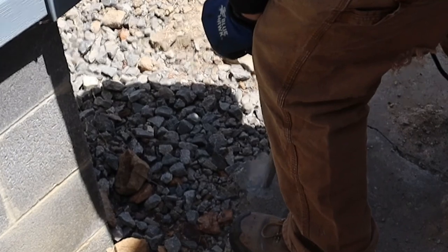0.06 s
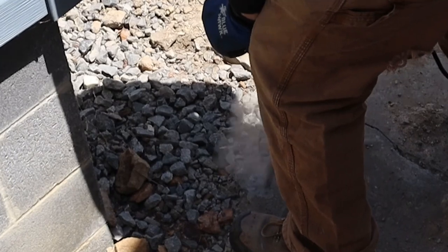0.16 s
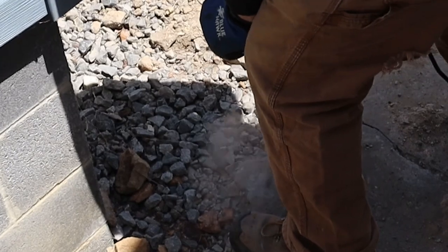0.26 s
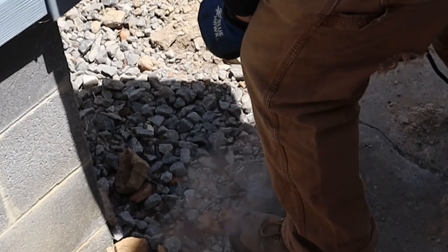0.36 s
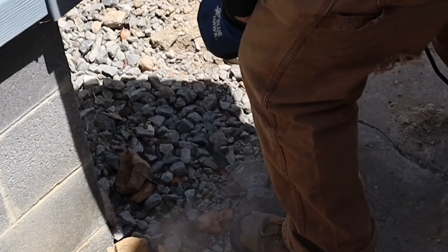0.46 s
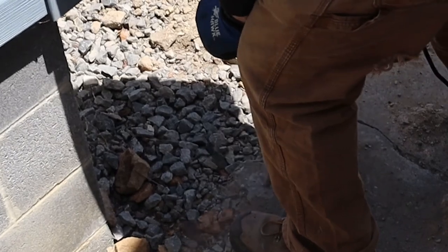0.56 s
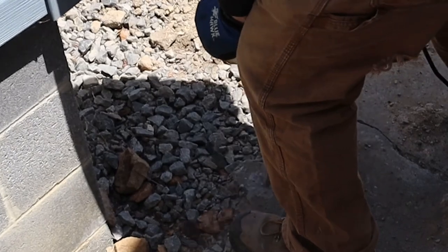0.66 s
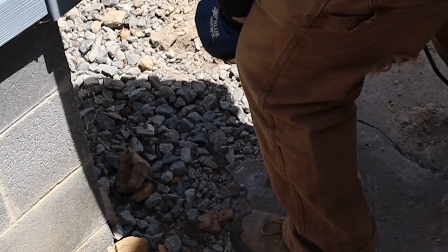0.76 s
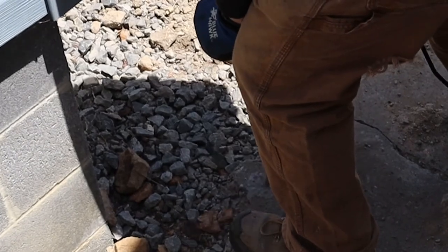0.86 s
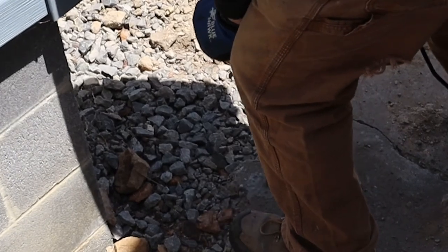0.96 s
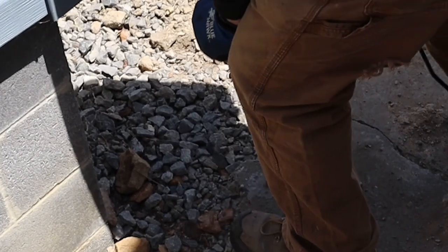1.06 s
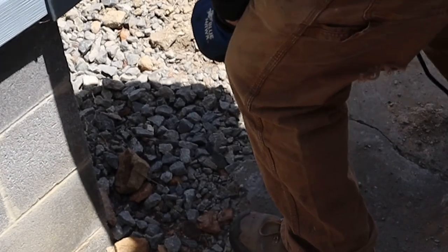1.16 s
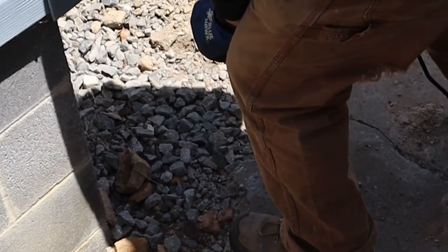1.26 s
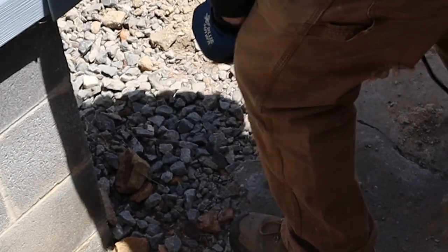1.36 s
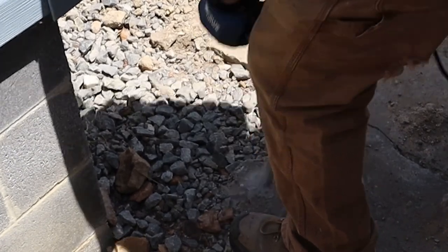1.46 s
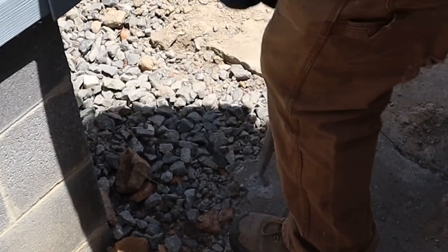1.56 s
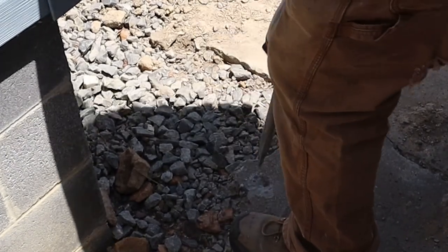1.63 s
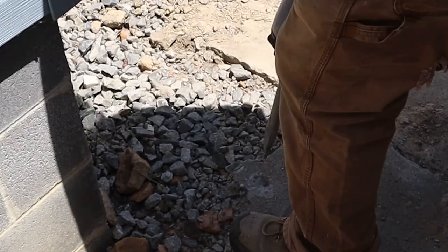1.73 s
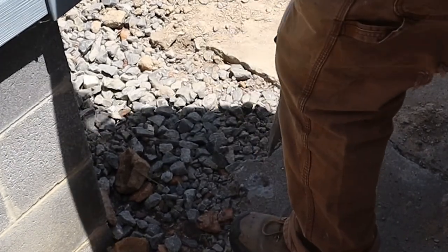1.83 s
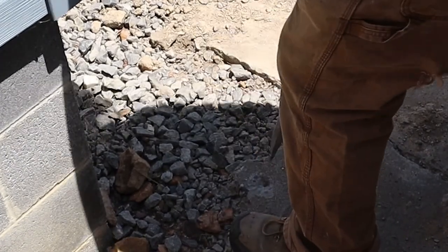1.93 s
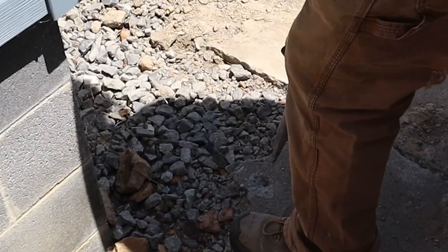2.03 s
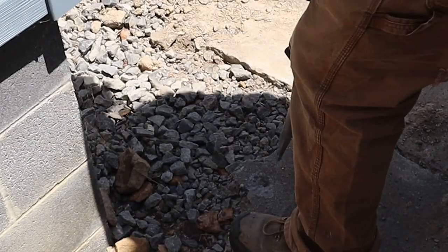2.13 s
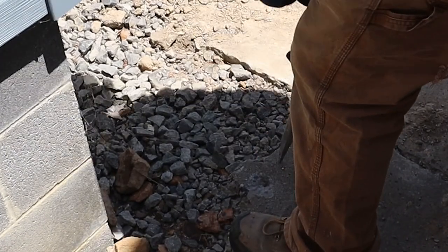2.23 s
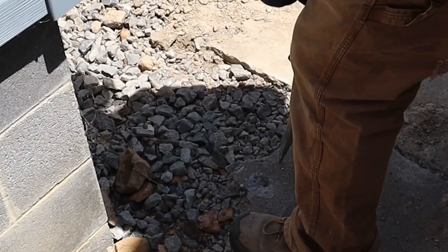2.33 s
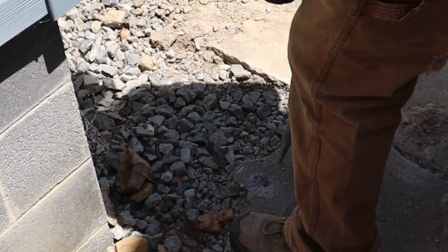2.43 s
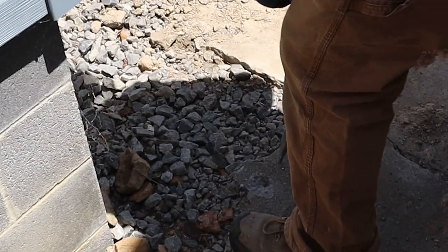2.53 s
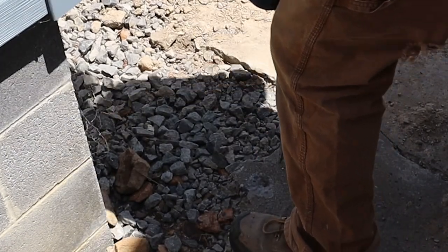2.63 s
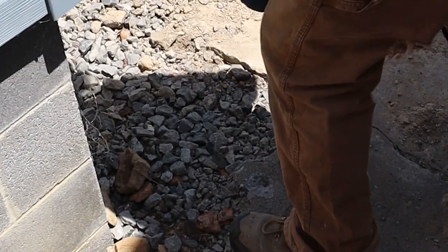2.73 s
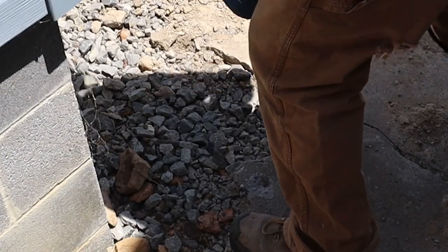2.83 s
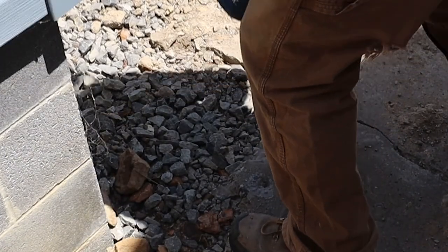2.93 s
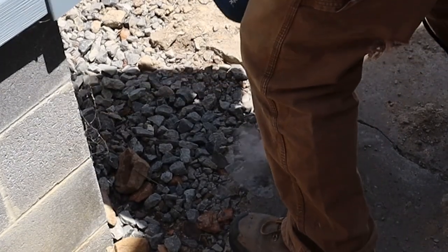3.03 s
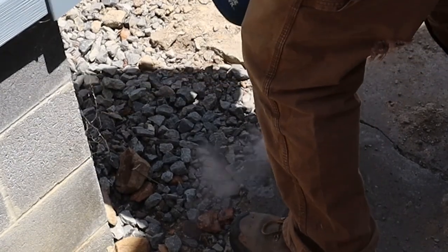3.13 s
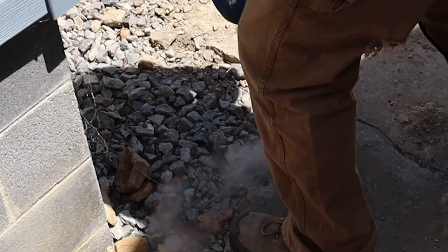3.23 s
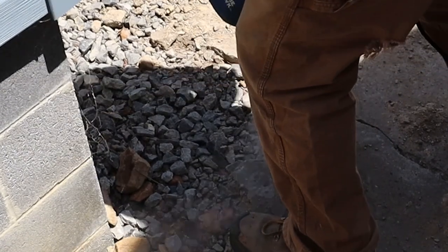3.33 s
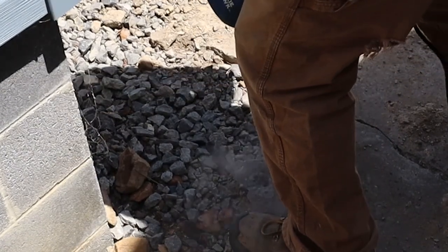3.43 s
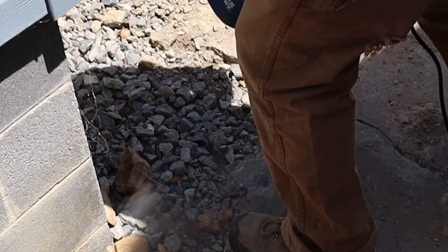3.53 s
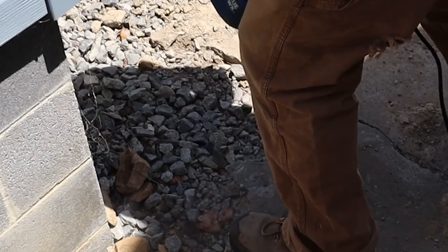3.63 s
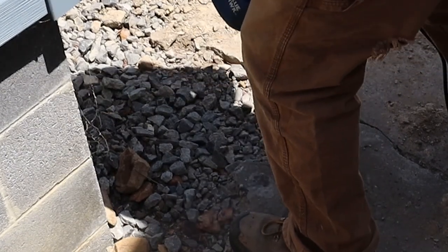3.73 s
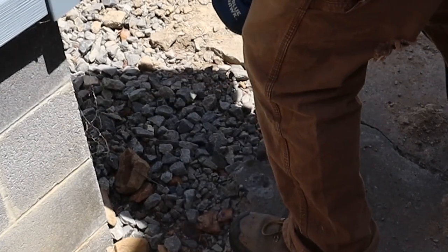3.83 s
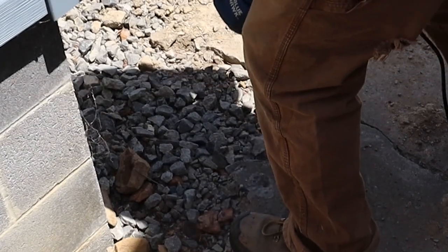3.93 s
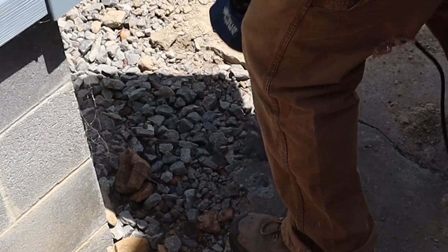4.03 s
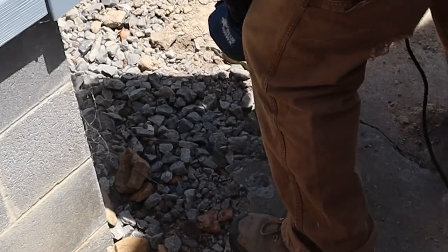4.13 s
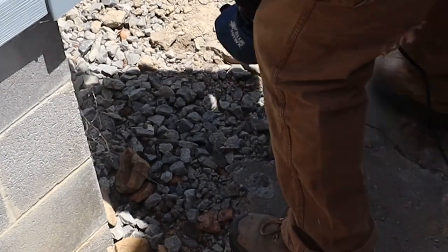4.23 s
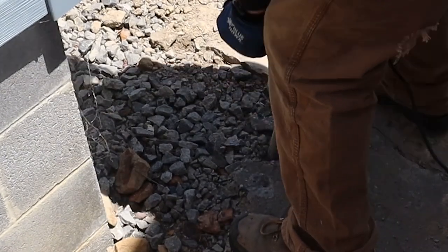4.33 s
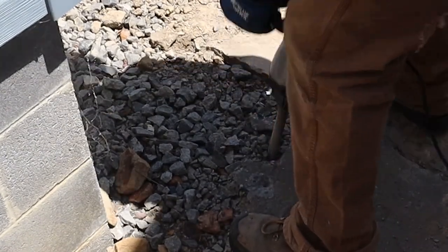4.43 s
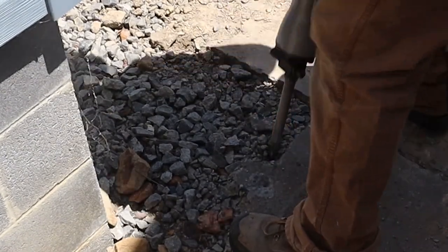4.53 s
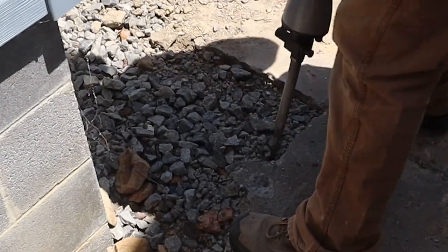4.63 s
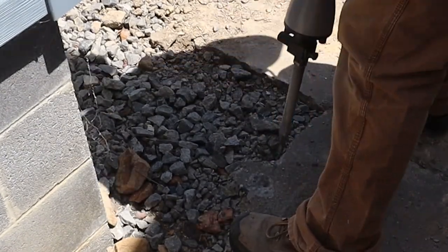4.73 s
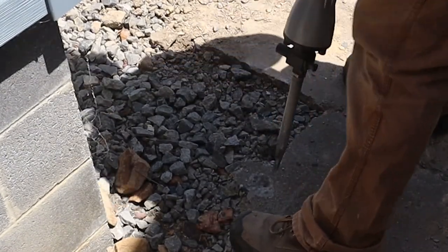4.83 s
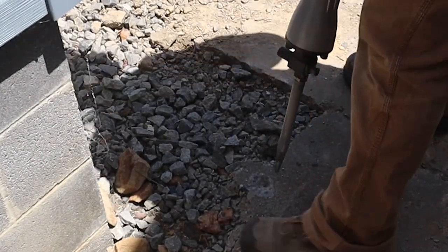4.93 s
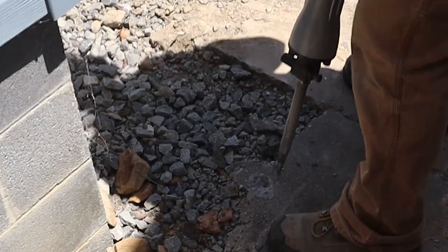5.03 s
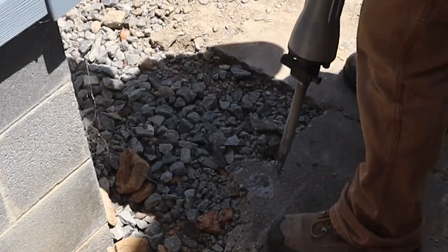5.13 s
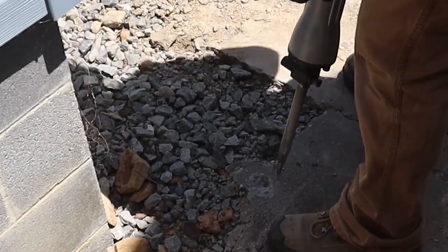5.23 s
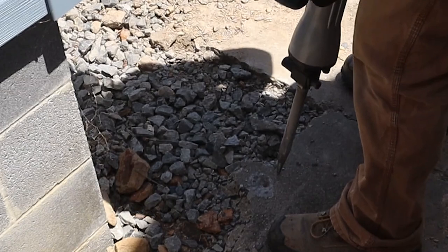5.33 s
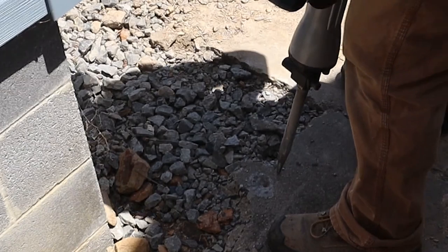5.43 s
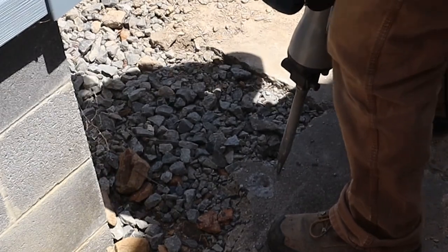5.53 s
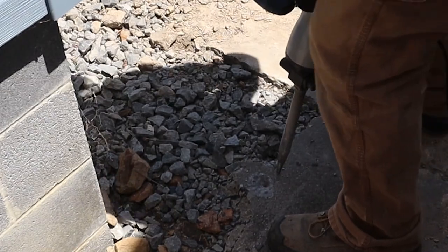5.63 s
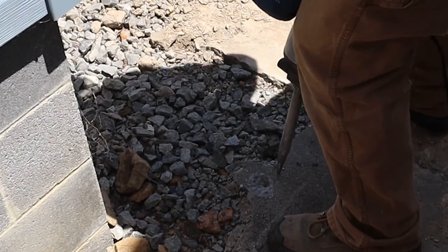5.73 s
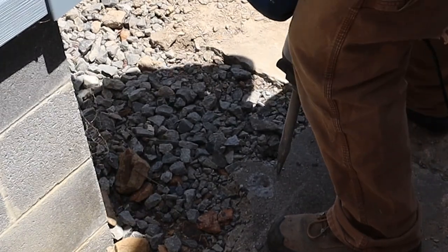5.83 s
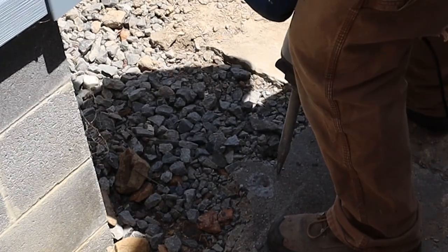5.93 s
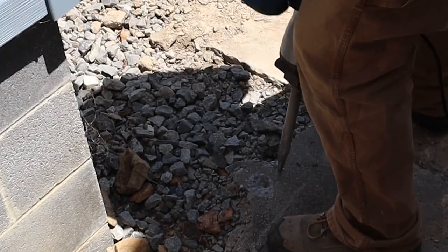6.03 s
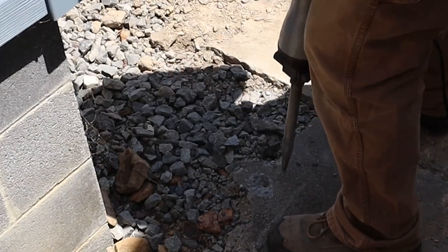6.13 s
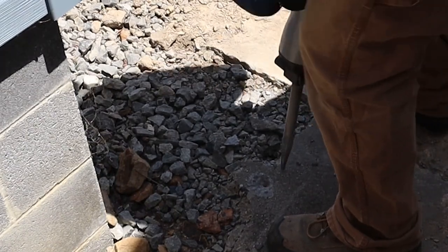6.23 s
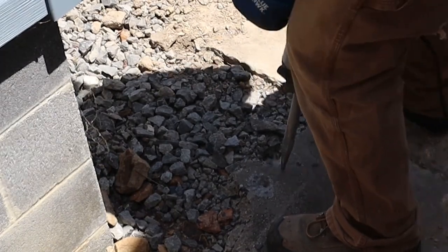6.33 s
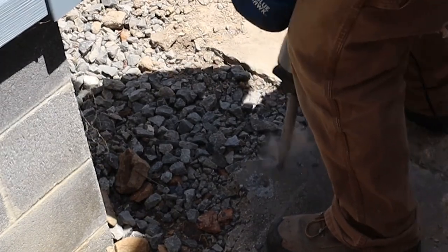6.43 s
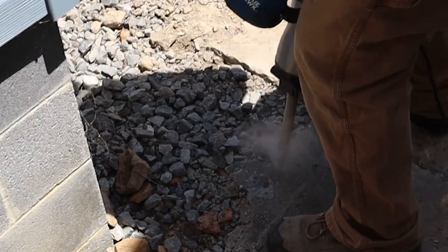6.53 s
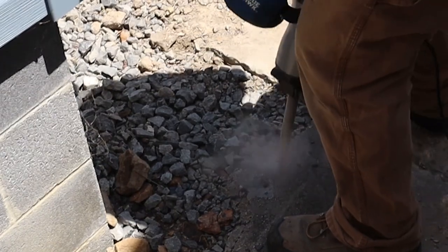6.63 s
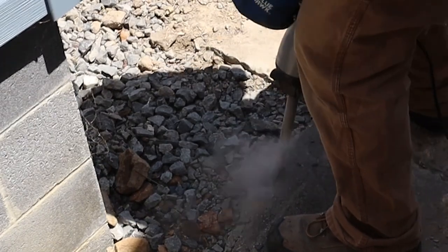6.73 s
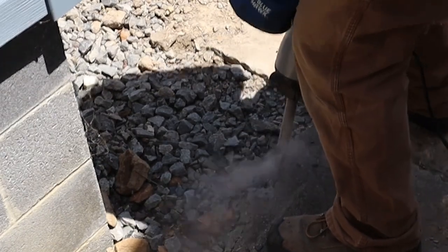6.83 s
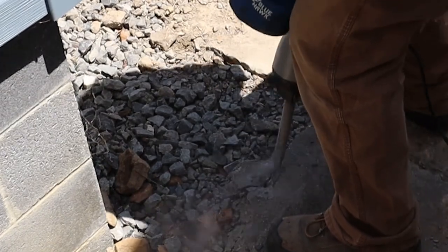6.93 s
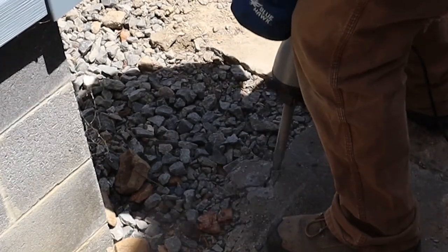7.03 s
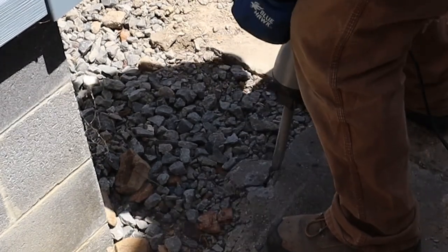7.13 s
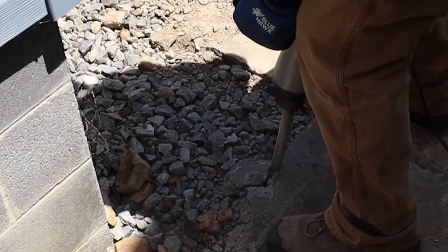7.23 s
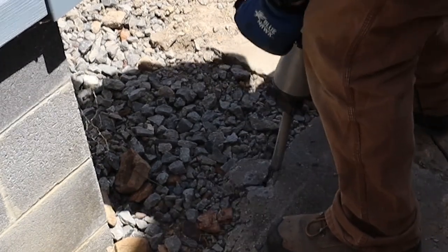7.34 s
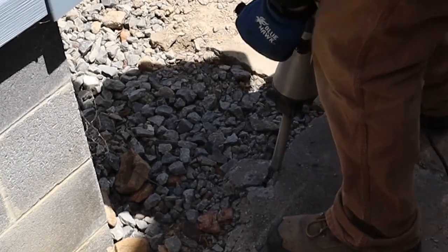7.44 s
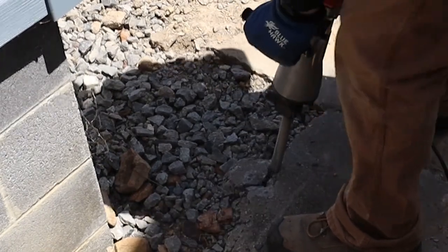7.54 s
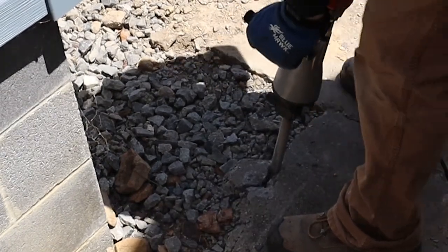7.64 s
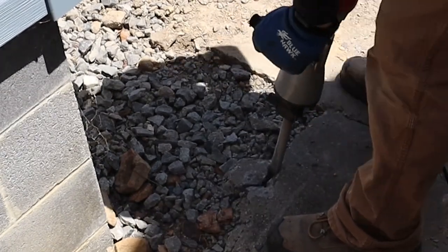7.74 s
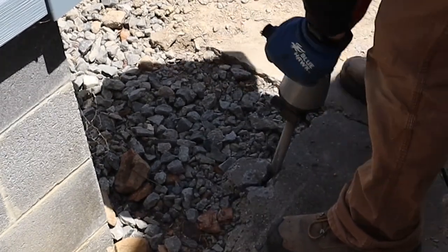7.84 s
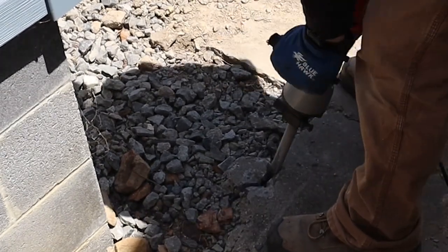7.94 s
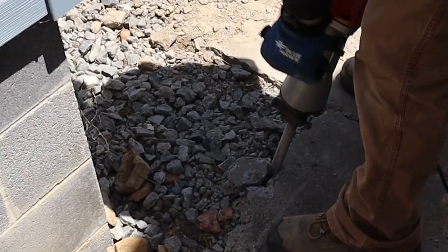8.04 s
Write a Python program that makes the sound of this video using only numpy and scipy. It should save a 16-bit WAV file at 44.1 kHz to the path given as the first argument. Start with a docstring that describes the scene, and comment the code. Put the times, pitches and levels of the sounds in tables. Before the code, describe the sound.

From the start to about 1.5 s an electric breaker pounds a concrete slab, roughly 23 to 25 blows a second, each a hard mid-pitched thud with a crack and short steel ring. It cuts off; the motor coasts in slowing rasping strokes until about 2.3 s, then clicks, gritty scrapes and near quiet. A sharp double knock at 2.9 s opens a second burst, brighter and ringing, weakening from 4.0 and ending near 4.5 s. Slowing gear strokes, metallic ticks and dull knocks follow until 5.5 s. At 5.65 s the gears catch, rattling loudly with a rising whine. Hammering resumes about 6.3 s, cracking strongly, then from 6.8 s softer, looser and rattlier, with the slab humming low. Blows grow slow and irregular after 7.4 s, the last at 7.86 s, leaving a fading motor and small knocks. Close stereo, outdoors, short wall echoes, very faint low background.

```python
"""Breaker on a concrete slab

An electric breaker hammers its steel chisel into a concrete slab beside a block wall, in three bursts.
Each blow sums slab and chisel modes, noise bursts for crack and rattle, and a dying shake of the ground.
Between bursts the motor coasts down, its crank strokes slowing; it spins up again with a gear rattle
and whine, made of flickering noise and blurred tones. Boots and tool shift on gravel as fading noise,
small knocks are clicks over damped sines, and a small stereo microphone stands close by."""
import sys
import numpy as np
from scipy import signal
from scipy.fft import rfft, irfft, next_fast_len
from scipy.io import wavfile
from scipy.ndimage import uniform_filter1d, map_coordinates

SR = 44100
rng = np.random.default_rng(int(sys.argv[2]) if len(sys.argv) > 2 else 0)


def to_wav(sig):
    """Store sig (one row per channel, or 1-D mono) as 16-bit WAV at the path in sys.argv[1].

    Samples outside -1..1 are clipped; the rate is SR.
    """
    pcm = np.clip(np.atleast_2d(sig), -1, 1) * 32767
    pcm = np.round(pcm).astype(np.int16)
    wavfile.write(sys.argv[1], SR, pcm.T)  # frames by channels


def makeup_ratio(level_db):
    """Linear amplitude ratio for a level in decibels (20 dB per factor of ten)."""
    decades = np.asarray(level_db, float) / 20
    return 10 ** decades


N = 356328  # length in samples

# Modes of the slab. Each row: frequency in Hz, width in Hz, relative level in dB, left minus right in dB.
SLAB_MODES = [(262.5, 27, 4, -5), (287.2, 31, 1.5, 3.5), (323, 28.5, -6, -4.5), (458.2, 36.8, 2.5, 2),
              (505, 31, 0.5, -2.5), (608, 25.3, -3, 9.5), (638.6, 20, -3.5, -4.5), (702, 18, -7, -2),
              (778, 50, 3, 1.5), (854, 21, -4.5, -2), (962, 72, 5.5, 5), (1024, 39.5, 8, 8.5),
              (1110, 25, -6.5, 0), (1163, 40, -9, 8.5), (1263, 18, -9, 4.5), (1407, 33, -6.5, 11),
              (1478, 31, -10.5, -8), (1544, 39, -7.5, -12), (1708, 33, -7.5, 8.5)]
# Noise colour of cracking concrete and clicks. Each row: frequency in Hz, relative density in dB per Hz.
CRACK_COLOUR = [(880, -58.5), (1500, 3.5), (2020, 4.5), (4920, 4.5), (5770, 2.5), (10000, -7.5),
                (11700, -4), (16000, -7.5)]
# Noise colour of gears and grating stones. Each row: frequency in Hz, relative density in dB per Hz.
GEAR_COLOUR = [(410, -23), (700, -11), (967, -17), (1140, -3), (1450, -9), (2170, -2.5), (3170, -1.5),
               (4530, -3.5), (4970, -5), (9040, -26), (11000, -29), (14300, -84.5), (22000, -120)]
# Noise colour of the humming housing. Each row: frequency in Hz, relative density in dB per Hz.
HOUSING_COLOUR = [(110, -71.5), (180, -9.5), (365, -1.5), (452, -2), (551, -5.5), (1200, -13), (1560, -12),
                  (2640, -120)]
# Noise colour of the deep rumble. Each row: frequency in Hz, relative density in dB per Hz.
RUMBLE_COLOUR = [(20, -33.5), (45, -7), (100, -6.5), (160, -8), (260, -14.5), (500, -100)]


def unit(x):
    """Scale to rms 1."""
    return x / np.sqrt(np.mean(x ** 2) + 1e-20)


def along(points, hz):
    """Read (Hz, value) points on a log frequency axis."""
    f, v = np.transpose(points)
    return np.interp(np.log(hz + 1), np.log(f + 1), v)


def curves(rows):
    """One value per sample for each column after the time."""
    s, *cols = np.transpose(rows)
    return [np.interp(np.arange(N) / SR, s, c) for c in cols]


def wobble(rate):
    """A smooth random curve, rate knots a second."""
    knots = rng.standard_normal(int(N * rate / SR) + 4)
    return map_coordinates(knots, [np.arange(N) * rate / SR])


def filtered(x, response):
    """Shape x by a complex response of frequency."""
    m = next_fast_len(N + SR // 2)
    return irfft(rfft(x, m) * response(np.fft.rfftfreq(m, 1 / SR)), m)[..., :N]


def modes(table, cycles=0):
    """Causal response of a struck body: damped sines, each building up over about this many cycles."""
    def response(f):
        total = 0
        for c, width, db in table:
            resonance = SR / np.pi * c / (c * c - f * f + 1j * f * width) / 2
            build_up = 1 + 2j * np.pi * cycles * (f / c - 1)
            total = total + makeup_ratio(db) * resonance / build_up
        return total
    return response


def rush(spectrum):
    """Stereo noise of rms 1, partly alike in both ears."""
    # Each row: frequency in Hz, left-right likeness from 0 to 1.
    likeness = [(60, 0.31), (300, 0.84), (1000, 0.69), (4000, 0.23), (12000, 0.085)]

    def mid_side(hz):
        turn = np.arccos(np.clip(along(likeness, hz), -1, 1)) / 2
        return makeup_ratio(along(spectrum, hz)) * [np.cos(turn), np.sin(turn)]
    mid, side = filtered(rng.standard_normal((2, N)), mid_side)
    return unit(np.array([mid + side, mid - side]))


def spikes(times, db):
    """One impulse per event."""
    return np.bincount(np.clip(np.round(times * SR).astype(int), 0, N - 1), makeup_ratio(db), N)


def dying(x, attack, t60):
    """Turn impulses into envelopes that rise and die away, cut off after a quarter second."""
    t = np.arange(SR // 4) / SR
    return np.abs(signal.fftconvolve(x, (1 - np.exp(-t / attack)) * makeup_ratio(-60 * t / t60))[:N])


def paced(table):
    """Evenly spaced times between the rows of a pace table."""
    spans = zip(table, table[1:] + table[-1:])
    return np.concatenate([np.linspace(a, b, n, endpoint=False) for (a, n), (b, _) in spans])


def strikes():
    """Time of every blow and how hard it drives slab, tip and chisel."""
    # Pace of the striker. Each row: start in seconds, count of evenly spaced blows up to the next row.
    pace = [(.014, 8), (.3635, 7), (.666, 7), (.9687, 10), (1.3994, 1), (1.4425, 1), (1.487, 1), (1.54, 1),
            (2.932, 1), (2.964, 1), (3.012, 2), (3.098, 6), (3.365, 3), (3.496, 1), (3.538, 8), (3.883, 5),
            (4.093, 1), (4.172, 2), (4.258, 1), (4.294, 2), (4.385, 2), (4.49, 1), (6.301, 1), (6.325, 1),
            (6.397, 1), (6.428, 3), (6.53, 2), (6.602, 4), (6.757, 3), (6.879, 4), (7.041, 2), (7.118, 1),
            (7.16, 2), (7.236, 2), (7.318, 1), (7.356, 2), (7.443, 1), (7.498, 1), (7.559, 1), (7.631, 1),
            (7.724, 1), (7.862, 1)]
    # Uneven gait: blows come late and early in turn. Each row: time in seconds, shift in seconds.
    limp = [(.7, 0), (.8, .00055), (1.08, .0005), (1.15, .0002), (1.4, .0004), (1.45, 0)]
    # How the blows land. Each row: time in seconds, then relative levels in dB of slab thud, tip crack,
    # chisel bending ring and lengthwise ring.
    bite = [(0, -7.5, -25, -11.5, -44), (.3, -6.5, -24.5, -8.5, -17), (1.472, -7, -24.5, -9.5, -14.5),
            (1.54, -10, -23, -11, -33), (2.93, -18.5, -25.5, -41, -20), (2.964, -5, -11, -7, -3),
            (3.012, -4, -19.5, -15, -5.5), (3.055, -2.5, -18.5, -29, -6.5), (3.1, -4.5, -19, -17, -10),
            (3.14, -4.5, -17.5, -19, -11.5), (3.232, -4, -20, -10, -9), (3.28, -3.5, -16, -12, -13),
            (3.365, -7, -18.5, -26, -6.5), (3.41, -4.5, -18.5, -10.5, -10), (3.5, -4.5, -20.5, -10, -12),
            (3.88, -9.5, -24, -12, -14.5), (3.926, -18.5, -29, -56, -25), (3.991, -5, -24, -11, -17.5),
            (4.1, -28, -23.5, -20, -26), (4.2, -31, -29, -43, -47), (4.4, -21, -22.5, -16, -28),
            (4.49, -32, -35, -37, -51), (6.299, -19, -24, -18, -28), (6.33, -12, -22, -15, -11),
            (6.4, -3, -12.5, -27.5, -8.5), (6.46, -7, -14.5, -36.5, -0.5), (6.5, -7.5, -22.5, -31, -34),
            (6.53, -8.5, -11.5, -32, -9), (6.566, -6.5, -19, -30, -16), (6.602, -7, -15.5, -30, -16),
            (6.641, -6, -17.5, -42, -15), (6.68, -6, -15, -31, -6), (6.718, -5.5, -15.5, -33.5, -17),
            (6.757, -8.5, -16.5, -30.5, -6.5), (6.798, -11.5, -18.5, -33.5, -12),
            (6.838, -12, -23, -30, -19), (6.879, -14, -23.5, -36, -15), (6.92, -19, -25, -35, -15.5),
            (6.96, -16.5, -22.5, -26, -10), (7.0, -14.5, -23, -29, -15.5), (7.041, -13.5, -21, -20, -15.5),
            (7.08, -20, -24.5, -26, -18), (7.118, -18.5, -20.5, -35, -20), (7.16, -16, -21, -34, -20.5),
            (7.198, -14, -20, -23, -20), (7.236, -18.5, -20, -25, -15), (7.277, -18, -21.5, -19, -27),
            (7.318, -19.5, -19, -20, -17.5), (7.356, -17, -21, -21, -23), (7.4, -15.5, -22.5, -24, -32.5),
            (7.443, -11.5, -19, -18, -23.5), (7.498, -15.5, -17.5, -20, -26), (7.559, -13, -17, -21, -12),
            (7.631, -14, -18.5, -11, -29), (7.724, -15, -14.5, -33, -32), (7.862, -15.5, -18, -24, -27)]
    s = paced(pace)
    s = s + np.interp(s, *np.transpose(limp)) * (-1) ** np.arange(len(s))
    s = s + .0002 * rng.standard_normal(len(s))  # timing jitter in seconds
    at, *cols = np.transpose(bite)
    return s, np.array([np.interp(s, at, c) for c in cols])


def blows():
    """The striker rings the chisel, bending waves spread through the slab, and concrete cracks."""
    # Blow-to-blow spread in dB, chisel well seated: thud, crack, bending ring, lengthwise ring.
    scatter_db = [.3, .8, 1, 1.5]
    # Where the tip stands. Each row: time in seconds, dB of the slab's upper modes over its lower ones.
    spot = [(0, 2), (1.55, 2), (2.9, 2.5), (4.499, 1.5), (6.3, -2), (6.75, -2), (6.95, -7), (7.15, 0),
            (7.35, 1.5), (7.9, -1)]
    # Ring pitch, higher where less of the steel is free. Each row: time in seconds, pitch factor.
    ring_pitch = [(1.6, 1.2), (2.9, 1), (4.5, 1), (6.3, 1.02), (6.85, 1.025), (6.92, 1.04), (6.97, 1.08),
                  (7.15, 1.16), (7.35, 1.24), (7.45, 1.3)]
    # Blow-to-blow spread: slab brightness in dB, then ring pitch factor.
    spot_scatter = [.5, .014]
    seated_db, wilder = -19.5, 0.059  # crack over thud when seated; added share of spread per dB above it
    s, levels = strikes()
    wild = 1 + wilder * np.maximum(levels[1] - levels[0] - seated_db, 0)
    spread_db = (rng.standard_normal((len(s), 4)) * scatter_db).T
    thud_db, crack_db, bend_db, length_db = levels + wild * spread_db
    at_spot = np.array([np.interp(s, *np.transpose(rows)) for rows in (spot, ring_pitch)])
    bright_db, stretch = at_spot + (rng.standard_normal((len(s), 2)) * spot_scatter).T
    ring = chisel_ring(s, bend_db, length_db, stretch)
    thud = slab_thud(s, thud_db, bright_db, wild)
    loose = collar_rattle(s, thud_db, crack_db) + shank_jangle(s, crack_db)
    return ring - thud + tip_crack(s, crack_db) + loose + crumble(s, thud_db) + shudder(s, thud_db)


def slab_thud(s, thud_db, bright_db, wild):
    """Each blow pushes the slab's bending modes, punches the concrete under the tip and rocks the slab."""
    # Concrete right under the tip. Each row: frequency in Hz, width in Hz, relative level in dB.
    punch = [(280, 190, 11), (557, 930, 14.5), (861, 300, 21.5)]
    mode_scatter_db, upper_hz = 1.3, 700  # spread per mode and blow; upper modes start here
    drive_db = thud_db + wild * mode_scatter_db * rng.standard_normal((len(s), len(SLAB_MODES))).T
    pushes = []
    for mode, db in zip(SLAB_MODES, drive_db):
        if mode[0] >= upper_hz:
            pushes.append(spikes(s + 0.00117, db + bright_db - 23.0))
        else:
            pushes.append(spikes(s + 0.00033, db - 21.0))
    waves = filtered(np.array(pushes), lambda f: [modes([m[:3]], cycles=.35)(f) for m in SLAB_MODES])
    pan_db = np.outer([.5, -.5], np.transpose(SLAB_MODES)[3])
    thud = makeup_ratio(pan_db) @ waves + filtered(spikes(s + 0.001516, thud_db - 28.0), modes(punch))

    def fading_lows(f):
        low_hz, wave_hz = 90, 189  # the slab radiates little below one; bending waves fade below the other
        radiated = (1j * f / (1j * f + low_hz)) ** 2
        return radiated * -f * f / (wave_hz ** 2 - f * f + 1.2j * f * wave_hz)
    return filtered(thud, fading_lows) + slab_heave(s, thud_db)


def under_thud():
    """Levels of ground shake, slab groan and slab heave, set by where the tip stands."""
    # Each row: time in seconds, then relative levels in dB of ground shake, slab groan and slab heave.
    quake = [(1.5, -38, -38, -28.5), (3, -47, -40, -29), (4.5, -31, -40.5, -27), (6.3, -57, -43.5, -32.5),
             (6.9, -42, -35.5, -34), (7.3, -34, -25, -18), (7.7, -35.5, -27, -26)]
    return curves(quake)


def slab_heave(s, thud_db):
    """The whole slab rocks on its bed in a few low modes."""
    # Each row: frequency in Hz, width in Hz, relative level in dB.
    rocking = [(70, 20, -10.5), (115, 28, -4.5), (161.8, 24.4, -1.5)]
    heave_db = under_thud()[2]
    return filtered(makeup_ratio(heave_db) * spikes(s + 0.0041, thud_db), modes(rocking, cycles=.5))


def chisel_ring(s, bend_db, length_db, stretch):
    """The struck steel rings in bending and lengthwise modes; a shorter free length rings higher."""
    # Bending ring. Each row: frequency in Hz, width in Hz, relative level in dB.
    bending = [(1940, 91, -2), (2092, 165, -0.5), (2450, 460, 10)]
    # Lengthwise ring at pitch factor 1. Each row: frequency in Hz, width in Hz, relative level in dB.
    lengthwise = [(2825, 250, -3.5), (3039, 264, 6), (3940, 69, -29), (4290, 160, -40.5)]
    damping_power = 5  # a shorter free length damps the ring: width grows with this power of the factor
    bounce = spikes(s, bend_db - 17.5) + spikes(s + 0.00192, bend_db - 28.0)  # the striker lands twice
    ring = filtered(bounce, modes(bending, cycles=0.29)) * makeup_ratio([[-2], [2]])
    step = np.round(stretch / .025) * .025  # blows of nearly equal pitch share one filter
    for k in np.unique(step):
        hit = spikes(s[step == k], length_db[step == k] - 5.0)
        shifted = [(k * c, width * k ** damping_power, db) for c, width, db in lengthwise]
        ring = ring + filtered(hit, modes(shifted, cycles=3.1))
    return ring


def tip_crack(s, crack_db):
    """Concrete cracks under the tip: a sharp noise burst with a softer, longer tail."""
    hit = spikes(s, crack_db)
    slack = spikes(s - .004, crack_db - 14)  # the piston takes up its slack just before each blow
    snap = makeup_ratio(2.5) * dying(hit + slack, 0.00061, 0.012)
    tail = makeup_ratio(-16.0) * dying(hit, 0.0015, 0.2)
    return (snap + tail) * rush(CRACK_COLOUR)


def shank_jangle(s, crack_db):
    """The shank jangles in its holder: a very short noise burst rings its modes."""
    # Each row: frequency in Hz, width in Hz, relative level in dB.
    shank = [(5560, 1100, -22.5), (8020, 470, -2), (9080, 980, 5), (11100, 760, -19.5), (12660, 550, -13.5),
             (14100, 900, -6)]
    burst = dying(spikes(s, crack_db), 0.00024, 0.013) * rng.standard_normal((2, N))
    return makeup_ratio(-19.5) * filtered(burst, modes(shank, cycles=2.3))


def collar_rattle(s, thud_db, crack_db):
    """The collar rattles when the chisel is not seated, louder the more crack exceeds thud."""
    # Each row: frequency in Hz, width in Hz, relative level in dB.
    collar = [(7910, 370, 4), (12240, 370, 2.5)]
    loose_db = crack_db + 0.5 * (crack_db - thud_db) - 20.5
    noise = unit(filtered(rng.standard_normal((2, N)), modes(collar, cycles=3)))
    return dying(spikes(s, loose_db), 0.0012, 0.22) * noise


def crumble(s, thud_db):
    """A short noisy tail after each blow, coloured by the slab's modes in each ear."""
    def both_ears(f):
        tables = [[(c, w, db + side * pan) for c, w, db, pan in SLAB_MODES] for side in (.5, -.5)]
        return [modes(table, cycles=.35)(f) for table in tables]
    noise = unit(filtered(rng.standard_normal(N), both_ears))
    return makeup_ratio(-32) * dying(spikes(s, thud_db), .002, .06) * noise


def shudder(s, thud_db):
    """After each thud the housing hums, the ground shakes and the slab groans, all dying slowly."""
    # The cracked piece of slab keeps humming. Each row: frequency in Hz, width in Hz, relative level in dB.
    cracked_piece = [(256.2, 18, 1.5), (280, 18, 0.5)]
    quake_db, groan_db, _ = under_thud()
    groan = makeup_ratio(groan_db) * unit(filtered(rng.standard_normal(N), modes(cracked_piece, cycles=1.6)))
    shake = makeup_ratio(-37) * rush(HOUSING_COLOUR) + makeup_ratio(quake_db) * rush(RUMBLE_COLOUR) + groan
    return dying(spikes(s, thud_db), 0.015, 0.4) * shake


def crank_load():
    """Gear gain: gears ease just before each idle crank stroke, then mostly swell, at a few they dip."""
    # Crank strokes without a blow. Each row: time in seconds, gear level change in dB (a swell, or a dip
    # where negative), t60 of the change in seconds.
    strokes = [(1.68, 3.5, 0.13), (1.751, 3.5, 0.4), (1.838, 6, 0.32), (1.934, 10, 0.25), (2.05, 7, 0.31),
               (2.203, 7.5, 0.2), (2.777, -10, 0.11), (2.854, 9, 0.29), (4.528, 4.5, .15), (4.584, 7, 0.36),
               (4.67, 11.5, 0.29), (4.765, 11.5, 0.37), (4.882, 15, 0.32), (5.03, 11, 0.42),
               (5.321, 24, 0.29), (5.648, -2, 0.12), (5.723, 5, 0.24)]
    hold = 1.53  # above 1 a change holds before it fades
    slack_s, slack = 0.01, 0.34  # how long and how far the gears ease
    load, ease = np.ones(N), np.ones(N)
    for s, db, t60 in strokes:
        since = np.arange(N) / SR - s
        load += (since > 0) * makeup_ratio(-60 * (np.abs(since) / t60) ** hold) * (makeup_ratio(db) - 1)
        ease *= 1 - slack * (since < 0) * np.exp(-np.abs(since) / slack_s)
    return load * ease


def motor():
    """Gears chatter, louder or softer at crank strokes; fan hiss and housing hum follow the effort."""
    # Motor effort as heard in the gears. Each row: time in seconds, relative level in dB.
    effort = [(0, -38.5), (1.56, -41), (1.7, -49.5), (1.9, -56), (2.3, -54.5), (2.44, -62.5), (2.6, -82),
              (2.738, -85), (2.786, -34.5), (2.87, -42.5), (2.98, -35.5), (3.4, -36), (4.3, -41.5),
              (4.5, -42), (4.68, -53.5), (4.97, -55), (5.08, -50), (5.25, -57.5), (5.39, -71), (5.5, -80),
              (5.6, -80), (5.654, -32), (5.73, -33), (5.85, -27.5), (6.2, -26), (6.42, -25.5), (6.52, -37),
              (7.55, -39.5), (7.7, -41.5), (7.85, -47.5), (7.88, -44), (7.95, -50.5), (8.08, -54.5)]
    # Noise colour of the fan. Each row: frequency in Hz, relative density in dB per Hz.
    fan_colour = [(4000, -32), (6000, 5), (8200, 5.5), (10000, -0.5), (12300, -8), (13500, -6),
                  (16200, -17.5)]
    # Gearbox modes. Each row: frequency in Hz, width in Hz, relative level in dB.
    gearbox = [(1190, 130, -12), (1685, 45, -4.5), (2260, 450, 9.5), (2660, 200, -2), (3090, 60, -9.5),
               (3725, 71, -1.5), (4580, 420, 0), (5700, 490, 13.5), (6300, 330, 9)]
    # Crankcase modes that rasp while a stroke swells. Each row: frequency in Hz, width in Hz,
    # relative level in dB.
    crankcase = [(2100, 230, -11), (2620, 340, -3), (4270, 530, -3)]
    gear_db, = curves(effort)
    fan_db = gear_db - 11 + 0.3 * np.minimum(gear_db + 31, 0)  # fades faster below -31 dB of effort
    hum_db = -26.5 + 0.73 * gear_db  # grows with a share of the effort
    load = crank_load()
    chatter = unit(makeup_ratio(2.93 * wobble(400) + .8 * wobble(60)))
    box = unit(filtered(chatter * rush(GEAR_COLOUR), modes(gearbox)))
    gears = makeup_ratio(gear_db) * unit(box + makeup_ratio(1.5) * chatter * rush(GEAR_COLOUR))
    fan = makeup_ratio(fan_db) * chatter * rush(fan_colour)
    hum = makeup_ratio(hum_db + 0.79 * wobble(22)) * rush(HOUSING_COLOUR)
    rumble = makeup_ratio(-14.5) * makeup_ratio(hum_db) * rush(RUMBLE_COLOUR)
    case = unit(filtered(chatter * rush(GEAR_COLOUR), modes(crankcase, cycles=2.8)))
    rasp = makeup_ratio(gear_db - 1.5) * np.maximum(load - 1, 0) * case
    return rasp + load * (gears + fan) + hum + rumble


def whine():
    """Fuzzy, patchy multiples of the motor's tooth rate; every blow jolts them louder for a moment."""
    # Three stretches of whine. Each row: time in seconds, tooth rate in Hz, then relative levels in dB
    # at that rate, at twice, at three and at four times it.
    stretches = [
        [(0, 2830, -83, -55.5, -54, -53.5), (.4, 2880, -75.5, -47.5, -56.5, -57.5),
         (.9, 2900, -88, -48.5, -56, -60.5), (1.56, 2910, -77, -47.5, -54, -51)],
        [(2.95, 2732, -63, -58, -51, -56), (3.9, 2693, -69, -54.5, -64, -64.5),
         (4.45, 2660, -71, -55, -72, -81)],
        [(5.7, 2050, -39, -50, -66, -75), (5.85, 2110, -33, -38, -66, -75), (6.05, 2190, -29, -34.5, -64, -75),
         (6.2, 2270, -28.5, -33, -66, -75), (6.35, 2320, -33.5, -37.5, -67.5, -73.5),
         (6.5, 2450, -52, -47, -42.5, -69), (6.95, 2700, -69, -42, -51, -70),
         (7.15, 2900, -66, -43.5, -62, -57.5), (7.38, 3120, -60, -38.5, -68, -57),
         (7.5, 3153, -68, -75, -72, -73)],
    ]
    # One value per multiple: blur rate in knots a second, lift by a blow in dB, flicker in dB.
    blur_rate, jolt_db, patchy_db = [750, 450, 800, 800], [6.4, 14, 21, 23.5], [2.5, 3, 2, 1]
    s = strikes()[0]
    jolt = dying(spikes(s, 0 * s), 0.00032, 0.022)
    out, t = np.zeros((2, N)), np.arange(N) / SR

    def blurred(phase, rate):
        return wobble(rate) * np.sin(phase) + wobble(rate) * np.cos(phase)
    for rows in stretches:
        hz, *levels_db = curves(rows)
        on = np.clip(np.minimum(t - rows[0][0], rows[-1][0] - t) / 0.058, 0, 1)  # fades in and out
        turn = 2 * np.pi * np.cumsum(hz * (1 + .004 * wobble(22))) / SR
        for k, db in enumerate(levels_db):
            both, left, right = [blurred((k + 1) * turn, blur_rate[k]) for _ in range(3)]
            level = on * makeup_ratio(db + patchy_db[k] * wobble(45)) * (1 + makeup_ratio(jolt_db[k]) * jolt)
            out += level * (0.6 * both + .6 * np.array([left, right]))
    return out


def slaps():
    """Gain that pulses as unloaded gears slap at both ends of each stroke, keeping their mean power."""
    # Each row: start in seconds, count of evenly spaced slaps up to the next row; all sound 3 ms earlier.
    slap_pace = [(5.748, 5), (5.858, 7), (5.989, 4), (6.069, 5), (6.159, 4), (6.229, 4), (6.295, 2),
                 (6.325, 1)]
    s = paced(slap_pace) - .003
    db = 9 + 1.5 * rng.standard_normal(len(s))
    late = .001 * rng.standard_normal(len(s))
    gain = 1 + dying(spikes(s + late, db), .002, .05)
    return gain / np.sqrt(uniform_filter1d(gain ** 2, size=SR // 16))


def scuffs():
    """Each shift starts quickly and fades: stones grate, the tool body murmurs, the ground rumbles."""
    # Boots and tool on gravel. Each row: start in seconds, t60 in seconds, then relative levels in dB
    # of grit, body and rumble.
    shifts = [(0, 2, -86, -71, -42.5), (1.55, 0.52, -80, -72, -66), (1.94, .2, -70, -79, -80),
              (2.05, 0.37, -59, -68, -53), (2.2, 0.22, -89, -75, -55), (2.324, 0.15, -45, -45, -58),
              (2.364, 0.18, -40, -43, -42), (2.45, 0.044, -36, -63, -75), (2.473, 0.29, -46, -56, -69),
              (2.699, 0.092, -96, -79, -44), (2.769, 0.27, -75, -43.5, -55), (2.912, 0.59, -33, -32.5, -50),
              (4.501, 0.89, -46, -51, -41), (4.729, 0.17, -47, -58, -47), (4.8, 0.38, -60, -55, -40.5),
              (4.899, 0.22, -49, -44.5, -42), (5.107, 0.38, -41, -46.5, -54), (5.25, 0.32, -49, -58, -72),
              (5.3, 0.61, -81.5, -60, -54), (5.411, 0.36, -79.5, -55, -44.5), (5.55, 0.18, -90, -84, -53),
              (5.642, 0.41, -48, -39, -52), (6.302, 0.32, -50, -34, -64), (7.1, 2.7, -67, -44, -50),
              (7.5, 1.38, -70, -46.5, -46.5), (7.789, 0.28, -71, -44, -38), (7.947, 0.36, -44, -69, -75)]
    rise_s = 0.0035
    t = np.arange(N) / SR
    envelopes = np.zeros((3, N))
    for s, t60, *dbs in shifts:
        age = np.maximum(t - s, 0)
        envelopes += (1 - np.exp(-age / rise_s)) * makeup_ratio(-60 * age / t60) * makeup_ratio(dbs)[:, None]
    grit, body, rumble = envelopes
    grate = unit(makeup_ratio(3.5 * wobble(300)))
    return grit * grate * rush(GEAR_COLOUR) + body * rush(HOUSING_COLOUR) + rumble * rush(RUMBLE_COLOUR)


def knocks():
    """A short gritty click, a dull, quickly damped knock under it and a little steel ring."""
    # Tool, trigger and stones. Each row: time in seconds, click level in dB, knock level in dB,
    # knock pitch in Hz, ring level in dB; all levels relative.
    taps = [(1.999, -40, -53, 656, -61), (2.334, -42.5, -33, 280, -60), (2.369, -25, -35.5, 271, -35),
            (2.452, -36.5, -67, 387, -42.5), (2.471, -33, -71, 283, -39.5), (2.746, -35.5, -45, 132, -61),
            (2.9298, -17.5, -16.5, 271, -46), (2.936, -47, -10.5, 107, -80), (2.9444, -10, -16, 227, -44),
            (4.634, -37.5, -70, 400, -60), (4.764, -29, -66, 400, -50), (4.901, -27.5, -60, 300, -55),
            (4.926, -29, -70, 400, -55), (5.001, -40, -70, 400, -62), (5.032, -26, -70, 400, -50),
            (5.324, -26.5, -55, 1120, -47), (4.716, -34, -70, 400, -64), (4.832, -28.5, -70, 397, -56.5),
            (4.966, -45, -74, 400, -58), (5.168, -40.5, -70, 400, -60), (5.1192, -20, -37, 310, -36),
            (5.293, -47.5, -40, 183, -53), (5.445, -44.5, -28, 158, -69), (5.467, -54, -29, 191, -92.5),
            (5.4978, -70, -36.5, 223, -87), (5.613, -29, -55, 517, -55), (7.752, -32.5, -48, 400, -50),
            (7.811, -52, -46, 257, -72), (7.823, -57.5, -34, 305, -73), (7.9483, -40, -67, 520, -39.5)]
    # Loose chisel retainer. Each row: frequency in Hz, width in Hz, relative level in dB.
    retainer = [(2190, 130, -2), (2320, 6, -13.5), (3900, 6, -28), (3120, 70, -1), (5250, 60, -5),
                (7250, 40, -19)]
    s, click_db, knock_db, knock_hz, ring_db = np.transpose(taps)
    click = dying(spikes(s, click_db - 13.0), 0.00097, 0.016) * rush(CRACK_COLOUR)
    out = click + filtered(spikes(s, ring_db), modes(retainer))
    t = np.arange(SR // 10) / SR
    for at, db, hz in zip(s, knock_db, knock_hz):
        phase = 2 * np.pi * hz * t
        body = np.sin(phase) + 0.47 * np.sin(1.75 * phase)
        body = body + 1.3 * np.sin(3.0 * phase) * makeup_ratio(-60 * t / 0.013)
        knock = makeup_ratio(db - 60 * t / 0.044) * (1 - np.exp(-t / 0.0016)) * body
        out[:, round(at * SR):][:, :len(t)] += knock
    return out


def yard(x):
    """Sound crosses to the microphone; wall and ground echo at different moments in each ear."""
    # Each row: left delay in seconds, right delay in seconds (both after the direct sound), level in dB.
    echoes = [(.0024, 0.002, -8.5), (.0052, 0.0031, -20.5), (.0083, 0.008, -15)]

    def late(f, s):
        return np.exp(-2j * np.pi * f * s)

    def paths(f):
        reflected = sum(makeup_ratio(db) * late(f, np.array([[left], [right]])) for left, right, db in echoes)
        return late(f, 0.001093) * (1 + reflected)
    return filtered(x, paths)


def outdoor_floor():
    """Faint steady noise, strongest in the bass."""
    return makeup_ratio(-70.5) * rush([(30, -5.5), (200, -13), (600, -20.5), (3000, -55.0), (9000, -66.5)])


def scene():
    """Hammer, motor, scuffs and small knocks over a faint outdoor floor."""
    machine = slaps() * (motor() + whine())
    return yard(blows()) + machine + scuffs() + knocks() + outdoor_floor()


def roll_off(x):
    """The treble ends steeply here."""
    return signal.sosfilt(signal.butter(12, 16810, fs=SR, output="sos"), x)


def record(dry):
    """Two microphones lean apart by frequency and drop deep bass; a treble step dulls; peaks saturate."""
    # Each row: frequency in Hz, left minus right in dB.
    lean = [(60, -1.5), (150, 2), (380, 2), (950, 1), (2380, -2.5), (5980, -2), (15000, -1.5)]
    clip_level = .6  # soft saturation level, full scale is 1

    def microphones(hz):
        tilt_db = along(lean, hz) * np.array([[.5], [-.5]])
        return makeup_ratio(tilt_db) * (1j * hz / (1j * hz + 60)) ** 3

    def treble_step(hz):
        return makeup_ratio(-34.0 * (hz > 15850))  # everything above this frequency in Hz is 34 dB softer
    heard = filtered(dry, lambda hz: microphones(hz) * treble_step(hz))
    heard = heard / (1 + np.abs(heard / clip_level) ** 4) ** .25
    return roll_off(heard)


dry = scene()
out = record(dry)
to_wav(out)
```